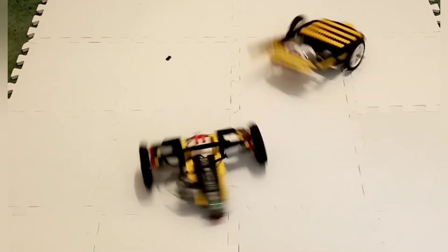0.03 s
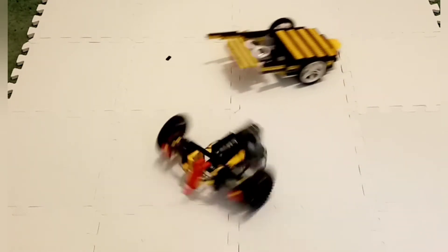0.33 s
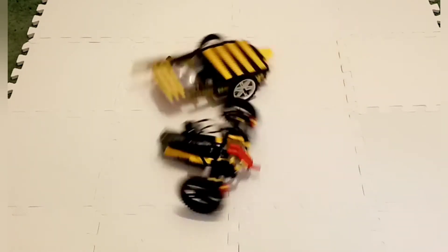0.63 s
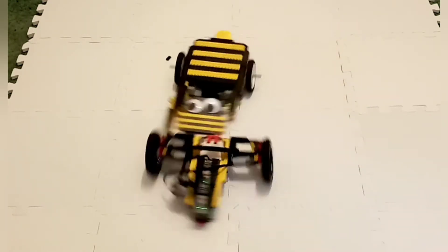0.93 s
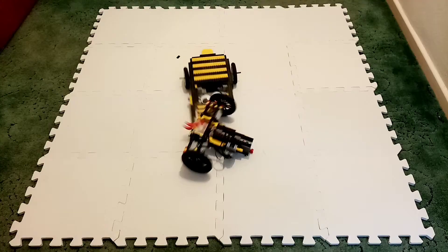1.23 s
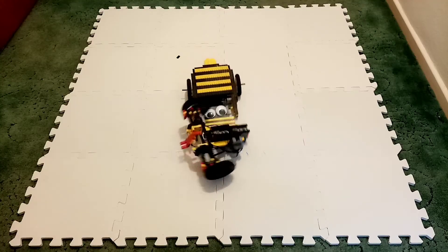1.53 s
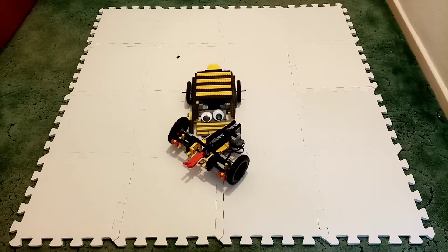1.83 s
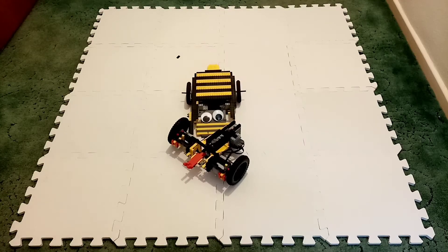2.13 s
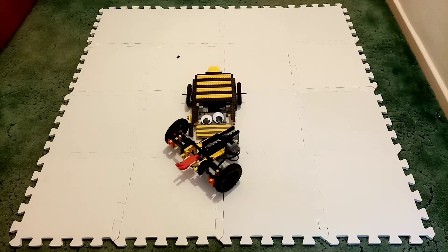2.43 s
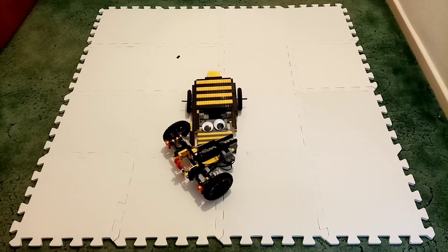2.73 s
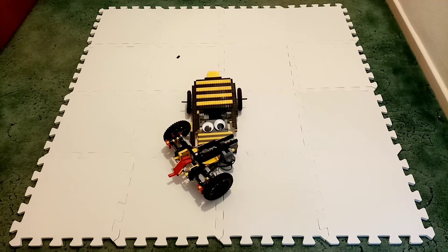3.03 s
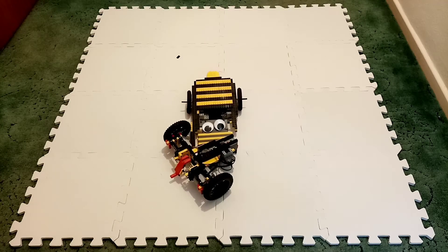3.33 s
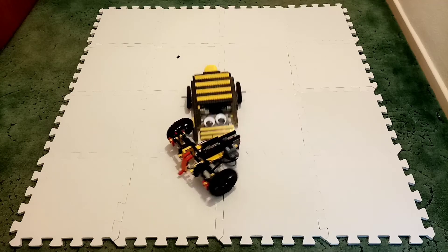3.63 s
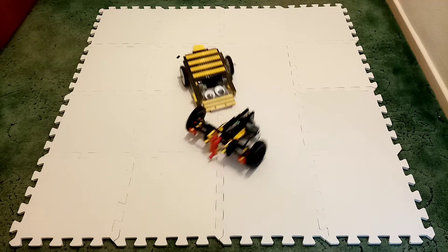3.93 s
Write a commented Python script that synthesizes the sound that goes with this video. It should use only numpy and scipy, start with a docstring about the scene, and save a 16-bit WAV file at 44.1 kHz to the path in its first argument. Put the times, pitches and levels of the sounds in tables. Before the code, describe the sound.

Plastic toy robots collide with sharp clacks, their gears whirring and loose parts rattling.

```python
"""A small room, a foam mat: two plastic toy robots drive, ram each other, lock and push, then roll on.
Each collision is a clatter of loose parts and snaps that ring the frames, over a chassis thud.
Rubbing parts squeak, gear teeth whir, loose shafts rattle, wheels rumble; stalled motors whine.
Two spaced microphones pick this up with wall reflections and a faint room rumble."""
import sys
import numpy as np
from scipy import signal
from scipy.fft import rfft, irfft, next_fast_len
from scipy.io import wavfile
from scipy.ndimage import map_coordinates

SR = 44100
rng = np.random.default_rng(int(sys.argv[2]) if len(sys.argv) > 2 else 0)


def wav_out(sig):
    """Save sig, one row per channel (or a flat mono array), as 16-bit PCM at SR to the path in sys.argv[1]."""
    wavfile.write(sys.argv[1], SR, np.round(np.clip(np.atleast_2d(sig).T, -1, 1) * 32767).astype(np.int16))


N = 176400

# Table levels are relative within each layer.
# collisions: start_s, length_s, level_db, thud_db, treble_db
COLLISIONS = [(0.04, 0.025, -47, -6, -1), (0.059, 0.008, -45.5, -9, 8), (0.342, 0.012, -40.5, -18, 3),
              (0.364, 0.02, -49.5, -6, 15), (0.657, 0.035, -42, 2.5, 5.5), (0.682, 0.026, -44, -7, -12),
              (0.786, 0.016, -41, -7, -6.5), (0.973, 0.042, -43, -7.5, 3), (1.0335, 0.0043, -32.5, -19, 6),
              (1.041, 0.0029, -28, -16, -5), (1.058, 0.025, -44.5, -3.5, -9), (1.237, 0.033, -53, 1, -7),
              (1.339, 0.018, -48.5, -1.5, -7), (1.375, 0.024, -44.5, -6, -7),
              (1.5742, 0.0055, -33, -10.5, -0.5), (1.586, 0.019, -42.5, -2, -7),
              (1.642, 0.021, -41.5, -2, 3), (1.683, 0.017, -48, 1.5, -4), (2.2955, 0.012, -47, -28, -3),
              (2.307, 0.0048, -43, -27, 7.5), (2.646, 0.029, -47, -11.5, -5),
              (3.251, 0.0057, -51.5, -22, 1), (3.432, 0.029, -47.5, -12.5, -1.5),
              (3.559, 0.029, -50.5, -6.5, -2), (3.8595, 0.015, -45.5, -7, 8), (3.95, 0.035, -52.5, -10, 4)]
# plastic snaps: start_s, level_db, splinter_db
PLASTIC_SNAPS = [(.0785, -27.5, -20), (0.3591, -21.5, -4), (0.573, -32.5, -15), (0.6741, -25, -1),
                 (0.9796, -22.5, 0), (1.0333, -20.5, 4), (1.043, -21, -7), (1.3641, -27.5, -3),
                 (1.5737, -27, 6), (1.579, -24, -5), (1.6445, -25, 4), (2.2965, -29.5, -15),
                 (2.3089, -28, -20), (2.639, -32.5, -15), (3.572, -36, -8), (3.861, -32, 6)]
# rubbing parts; chassis bumps on the mat: start_s, length_s, pitch_hz, level_db
RUB_SQUEAKS = [(.078, 0.017, 6400, -40.5), (.49, .02, 1600, -52), (.57, 0.028, 1610, -50),
               (0.711, 0.019, 2110, -50), (.964, 0.024, 1470, -46), (1.381, .02, 2313, -50.5),
               (1.685, 0.014, 819, -47), (2.298, .018, 1550, -50.5), (2.638, 0.014, 2394, -49),
               (3.25, 0.0077, 2566, -50), (3.572, 0.015, 2310, -50.5), (3.745, 0.05, 5070, -58),
               (3.86, 0.012, 2237, -55), (3.86, 0.029, 4870, -55), (3.96, .04, 4850, -59)]
MAT_BUMPS = [(.645, 0.029, 262, -37), (.71, 0.03, 234, -44), (1.78, 0.036, 189.3, -53.5)]
# drive envelopes: time_s, level_db
WHIR_LEVEL = [(0.0, -46), (0.22, -48.5), (0.5, -50), (0.96, -48.5), (1.12, -52.5), (1.94, -54.5),
              (3.46, -55), (3.74, -52.5), (4.0, -50.5)]
MESH_LEVEL = [(0, -54), (.33, -58), (.66, -62), (.85, -53), (1.1, -57), (1.2, -82)]
RATTLE_LEVEL = [(0.0, -42), (0.14, -49), (0.5, -48.5), (0.96, -47), (1.18, -54), (1.57, -53), (1.8, -60),
                (2.07, -64.5), (2.34, -71), (2.49, -59), (2.8, -71), (3.38, -76), (3.5, -57.5),
                (3.61, -54.5), (4.0, -50.5)]
ROLL_LEVEL = [(0.0, -57), (0.49, -62.5), (0.91, -60.5), (1.09, -63), (1.35, -74.5), (1.68, -61.5),
              (1.84, -85), (1.98, -100), (3.42, -90), (3.5, -58), (3.64, -72), (3.71, -64), (4.0, -63)]
# straining motors: start_s, end_s, pulse_hz, level_db
MOTOR_STRAINS = [(1.798, 2.185, 326.6, -72.5), (2.11, 2.727, 330, -66), (2.733, 3.43, 332.3, -66)]
# motor partials: harmonic, level_db
MOTOR_PARTIALS = [(3, -1), (6, -9.5), (8, -5.5), (22, -4)]
# loaded gears: start_s, end_s, pitch_hz, level_db
GEAR_WHINES = [(1.794, 2.29, 2050, -71), (2.718, 3.438, 893, -76.5), (2.72, 3.8, 2900, -76),
               (2.733, 4.5, 2000, -72.5), (2.72, 3.9, 7230, -63)]
# plastic frame resonances: centre_hz, width_hz, level_db
FRAME_MODES = [(1390, 98, 1.5), (2240, 300, -6.5), (2700, 330, -4), (4500, 230, -2), (5930, 620, 4.5),
               (6585, 390, 12.5)]
# source spectra: freq_hz, level_db
PANEL_SPECTRUM = [(150, -46.5), (550, -8.5), (850, -1), (1500, 0), (2300, 6), (3200, 0.5), (4800, 0.5),
                  (7000, -32), (12000, -19)]
EDGE_SPECTRUM = [(300, -19), (2000, -10.5), (3600, -10.5), (5000, -1), (6400, -7), (8000, -6.5),
                 (11000, -16.5), (15000, -26)]
THUD_SPECTRUM = [(25, -49), (70, -17.5), (150, -4), (240, -2), (330, -6), (500, -12), (790, -2.5),
                 (1500, -26), (4000, -49.5)]
SNAP_SPECTRUM = [(300, -13), (2000, -5), (6000, 1), (9000, -9), (15000, -26)]
WHIR_SPECTRUM = [(100, -11.5), (550, -24), (1000, -19.5), (3200, -11.5), (5200, -8), (6100, -3.5),
                 (7300, -2.5), (8400, -9.5), (10500, -13.5), (15000, -15)]
RATTLE_SPECTRUM = [(300, -13), (550, -9), (850, -1), (1550, -2), (1850, -1.5), (2300, -2.5), (3200, -2),
                   (4700, 1), (7000, -9.5), (12000, -14.5)]
ROLL_SPECTRUM = [(25, -60), (60, -25.5), (120, -8.5), (240, -5), (310, -6), (420, -9), (560, -15),
                 (850, -13.5), (2000, -34.5)]
RUMBLE_SPECTRUM = [(25, -23), (70, -2), (110, 6), (220, -6.5), (400, -9.5), (2000, -23)]
# room decay: freq_hz, t60_s
ROOM_DECAY = [(150, 0.56), (600, 0.4), (2000, 0.38), (6000, 0.32), (14000, 0.29)]
# microphone responses: freq_hz, gain_db
LEFT_RESPONSE = [(60, -10.5), (250, -6), (1300, 0.5), (4400, -1.5), (7000, -4), (9500, 3), (12000, -19.5),
                 (13700, -39), (15100, -11)]
RIGHT_RESPONSE = [(60, -8.5), (250, 0), (1300, 4), (4400, 3), (7000, 4.5), (9500, 2), (12000, -3),
                  (13700, -0.5), (15100, 9)]


def collisions():
    """Bursts of contacts on broad panels and hard edges, over a chassis thud."""
    panel, edge, thud = np.zeros((3, N))
    contacts = ticks(rate_hz=1300, spread_db=3)
    for start_s, length_s, level_db, thud_db, treble_db in COLLISIONS:
        shape = gate(start_s, length_s, attack_s=0.00048, release_s=0.0039)
        burst = unit(shape * contacts) * np.sqrt(np.mean(shape ** 2)) * amp(level_db)
        panel += burst * amp(-treble_db / 2)
        edge += burst * amp(treble_db / 2)
        thud += burst * amp(thud_db)
    edge *= rng.choice([-1, 1], N)
    clatter = colour(panel, PANEL_SPECTRUM) + colour(edge, EDGE_SPECTRUM)
    return amp(-3) * frame_ring(clatter) + amp(2) * colour(thud, THUD_SPECTRUM)


def snaps(highpass_hz=9500):
    """Plastic snaps: an impulse into the frame plus a splinter of treble noise."""
    impulses, envelope = np.zeros((2, N))
    for start_s, level_db, splinter_db in PLASTIC_SNAPS:
        impulses[round(start_s * SR)] += amp(level_db)
        envelope += amp(level_db + splinter_db) * gate(start_s, 0, attack_s=0.0003, release_s=0.0078)
    hiss = envelope * rng.standard_normal(N)
    splinters = filtered(hiss, lambda f: 1 - 1 / (1 + (f / highpass_hz) ** 8))
    return amp(11) * frame_ring(colour(impulses, SNAP_SPECTRUM)) + amp(-11) * splinters


def frame_ring(x):
    """Contacts ring the plastic frames."""
    modes = lambda f: sum(amp(db) * resonance(f, hz, width_hz) for hz, width_hz, db in FRAME_MODES)
    return filtered(x, lambda f: 1 + amp(-9) * modes(f))


def gears(mesh_hz=1576):
    """Free-running gears: ticking teeth whir, the mesh whines roughly."""
    teeth = unit(ticks(rate_hz=2600, spread_db=5.5) + 0.39 * rng.standard_normal(N))
    whir = colour(teeth, WHIR_SPECTRUM) * level(WHIR_LEVEL) * amp(1 + 0.36 * wobble(17))
    phase = rotation(mesh_hz * (1 + 0.06 * wobble(400)), drift=0.0099)
    return whir + np.sin(phase) * level(MESH_LEVEL) * amp(5.2 * wobble(60))


def shafts():
    """Loose shafts rattle in the frames."""
    contacts = colour(ticks(rate_hz=800, spread_db=4), RATTLE_SPECTRUM)
    return unit(frame_ring(contacts)) * level(RATTLE_LEVEL) * amp(0.5 + 0.92 * wobble(25.23))


def wheels():
    """Wheels rumble on the mat."""
    rumble = colour(rng.standard_normal(N), ROLL_SPECTRUM)
    return rumble * level(ROLL_LEVEL) * amp(9.5 + 1.3 * wobble(21.98))


def squeaks():
    """Rubbing parts squeak."""
    return rough_tones(RUB_SQUEAKS, jitter=0.0508, flutter_hz=899, t60_s=0.0087)


def bumps():
    """A chassis bumps the mat and hums briefly."""
    return rough_tones(MAT_BUMPS, jitter=0.086, flutter_hz=93.9, t60_s=0.1)


def stalled_motors():
    """Straining motors sing wavering harmonics; the brushes rasp once a pulse. Stereo."""
    tones, rasp = np.zeros((2, N)), np.zeros(N)
    for start_s, end_s, pulse_hz, level_db in MOTOR_STRAINS:
        phase = rotation(pulse_hz, drift=0.00316)
        effort = amp(level_db) * gate(start_s, end_s - start_s, attack_s=0.16, release_s=0.014)
        for harmonic, partial_db in MOTOR_PARTIALS:
            tones += effort * amp(partial_db + 1.9 * wobble(220)) * stereo_tone(harmonic * phase)
        rasp += effort * (1 + np.cos(phase)) ** 2 / 2
    grit = rng.standard_normal((2, N))
    brush_band = lambda f: resonance(f, centre_hz=7350, width_hz=400)
    return tones + amp(4) * filtered(rasp * grit, brush_band) / np.std(filtered(grit, brush_band))


def loaded_gears():
    """Gears whine at near-steady pitches as the robots push. Stereo."""
    out = np.zeros((2, N))
    for start_s, end_s, pitch_hz, level_db in GEAR_WHINES:
        shape = gate(start_s, end_s - start_s, attack_s=0.034, release_s=0.029)
        out += amp(level_db + 2.3 * wobble(150)) * shape * stereo_tone(rotation(pitch_hz, drift=0.00344))
    return out


def room_rumble():
    """Faint, steady low noise."""
    return amp(-73.5) * colour(rng.standard_normal(N), RUMBLE_SPECTRUM)


def room_response(echoes=8, onset_s=0.0016):
    """Stereo impulse response at one spot: short tail plus near-wall echoes."""
    hz, t, noise = signal.stft(rng.standard_normal((2, SR // 2)), SR, nperseg=256)
    decay = amp(-60 * t / along(ROOM_DECAY, hz)[:, None])
    tail = signal.istft(noise * decay, SR, nperseg=256)[1]
    tail *= np.clip(np.arange(tail.shape[1]) / SR / onset_s, 0, 1)
    response = amp(4) * tail / np.linalg.norm(tail[0])
    for side in response:
        delays_s = rng.uniform(0.002, 0.016, echoes)
        side[(delays_s * SR).astype(int)] += amp(-11.5) * rng.choice([-1, 1], echoes)
    return response


def room(direct, send, right_lag_s=0.001):
    """Direct sound arrives left first; reflections crossfade as the robots move."""
    wet, hop = np.zeros((2, 2 * N)), N // 16
    for centre in range(0, N + hop, hop):
        a, b = max(centre - hop, 0), min(centre + hop, N)
        part = send[a:b] * np.cos(np.pi / 2 * (np.arange(a, b) - centre) / hop)
        reflections = signal.fftconvolve(part[None], room_response(), axes=1)
        wet[:, a:a + reflections.shape[1]] += reflections
    bass_cut = lambda f: amp(along([(200, -10.5), (600, -6), (1300, -0.5)], f))
    lag = lambda f: np.exp(-2j * np.pi * f * np.array([[0], [right_lag_s]]))
    return amp(-5.5) * (filtered(direct, lag) + filtered(wet[:, :N], bass_cut))


def rough_tones(rows, jitter, flutter_hz, t60_s):
    """Short tones, unsteady in pitch and level."""
    out = np.zeros(N)
    bend = 1 + jitter * wobble(flutter_hz)
    swell = amp(3.2 * wobble(flutter_hz / 2))
    for start_s, length_s, pitch_hz, level_db in rows:
        shape = gate(start_s, length_s, attack_s=0.00068, release_s=t60_s / np.log(1000))
        out += amp(level_db) * swell * shape * np.sin(2 * np.pi * np.cumsum(pitch_hz * bend) / SR)
    return out


def stereo_tone(phase, left_lead_rad=1.2):
    """Sine pair with a random start phase."""
    return np.sin(phase + rng.uniform(0, 2 * np.pi) + np.array([[left_lead_rad], [0]]))


def rotation(hz, drift):
    """Phase of a slightly unsteady rotation."""
    return 2 * np.pi * np.cumsum(hz * (1 + drift * wobble(30))) / SR


def ticks(rate_hz, spread_db):
    """Irregular contacts of uneven size, rms 1."""
    hit = rng.random(N) < rate_hz / SR
    return unit(hit * rng.choice([-1, 1], N) * amp(spread_db * np.clip(rng.standard_normal(N), -2, 2)))


def gate(start_s, length_s, attack_s, release_s):
    """Linear attack, hold, exponential release."""
    t = clock() - start_s
    return np.clip(t / attack_s, 0, 1) * np.exp(-np.clip((t - length_s) / release_s, 0, 20))


def resonance(f, centre_hz, width_hz):
    """Two-pole band-pass response, peak 1."""
    return 1j * f * width_hz / (centre_hz ** 2 - f * f + 1j * f * width_hz)


def colour(x, spectrum, size=2048):
    """Minimum-phase filter of energy 1."""
    cepstrum = irfft(np.log(amp(along(spectrum, np.fft.rfftfreq(size, 1 / SR)))))
    cepstrum[1:size // 2] *= 2
    cepstrum[size // 2 + 1:] = 0
    response = irfft(np.exp(rfft(cepstrum)))
    return signal.oaconvolve(x, response / np.linalg.norm(response))[:N]


def filtered(x, response):
    """Apply a complex frequency response."""
    size = next_fast_len(N + SR // 2, True)
    return irfft(rfft(x, size) * response(np.fft.rfftfreq(size, 1 / SR)), size)[..., :N]


def wobble(rate_hz):
    """Smooth curve through random knots."""
    return map_coordinates(rng.standard_normal(4096), [clock() * rate_hz], mode="wrap")


def level(rows):
    """Gain per sample from time_s, level_db rows."""
    return amp(np.interp(clock(), *np.transpose(rows)))


def along(points, hz):
    """Interpolate on a log frequency axis."""
    knots_hz, values = np.transpose(points)
    return np.interp(np.log(hz + 1), np.log(knots_hz + 1), values)


def clock():
    """Sample times in s."""
    return np.arange(N) / SR


def amp(db):
    """Decibels to gain."""
    return 10 ** (np.asarray(db) / 20)


def unit(x):
    """Scale to rms 1."""
    return x / np.sqrt(np.mean(x ** 2) + 1e-20)


def scene():
    """Both robots in the room; squeaks radiate straight at the microphones, stall sounds stay dry."""
    rubbing = squeaks()
    mix = collisions() + snaps() + gears() + shafts() + wheels() + bumps() + room_rumble()
    return room(direct=mix + amp(10.5) * rubbing, send=mix + rubbing) + stalled_motors() + loaded_gears()


def record(dry, dip_at_s=1.206, dip_width_s=0.011, top_hz=15550):
    """The level dips briefly once; each microphone adds its colour; the top treble is cut."""
    dip = 1 - 0.85 * np.exp(-abs(clock() - dip_at_s) / dip_width_s)
    heard = filtered(dry * dip, lambda f: amp([along(LEFT_RESPONSE, f), along(RIGHT_RESPONSE, f)]))
    return filtered(heard, lambda f: f < top_hz)


dry = scene()
out = record(dry)
wav_out(out)
```